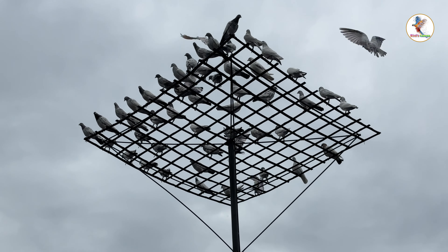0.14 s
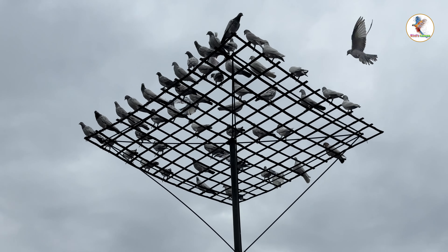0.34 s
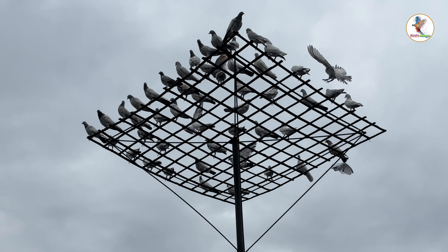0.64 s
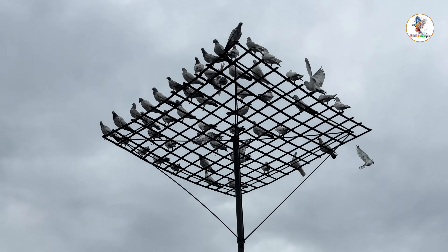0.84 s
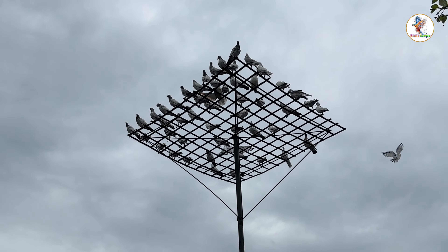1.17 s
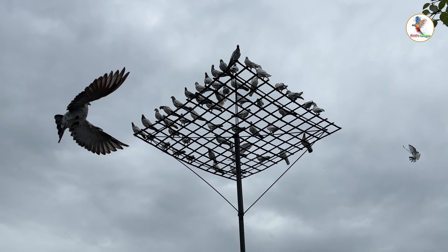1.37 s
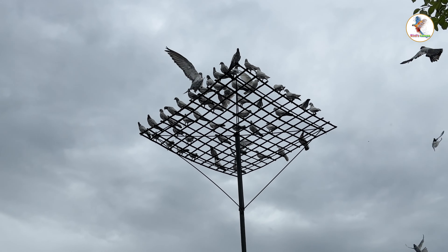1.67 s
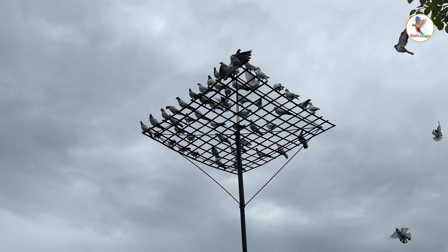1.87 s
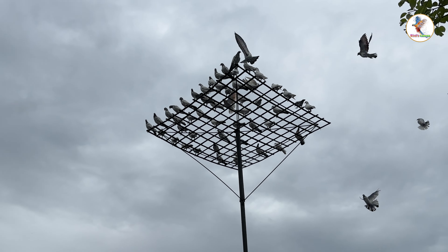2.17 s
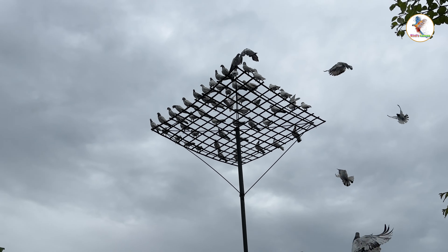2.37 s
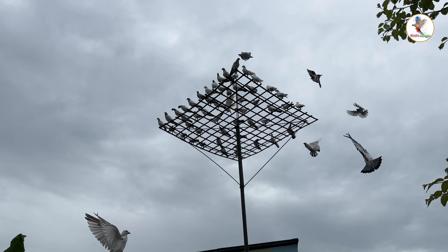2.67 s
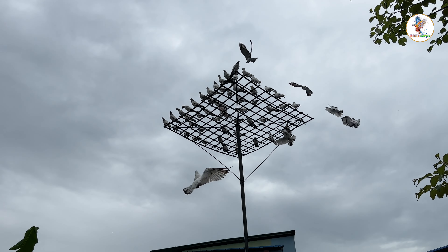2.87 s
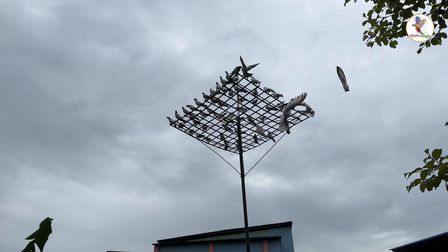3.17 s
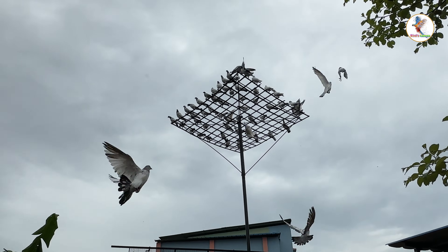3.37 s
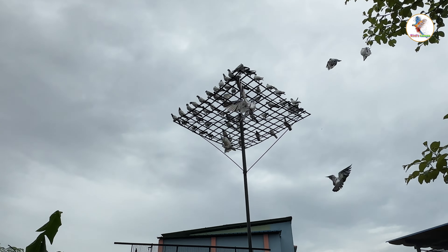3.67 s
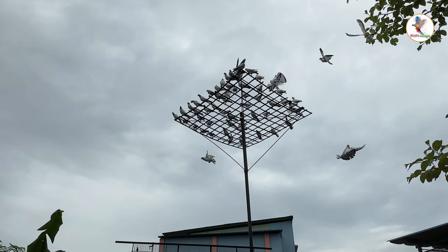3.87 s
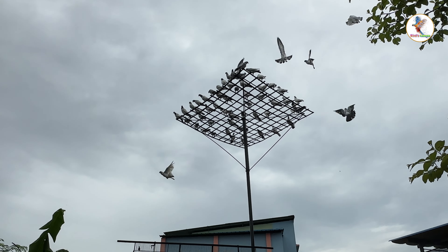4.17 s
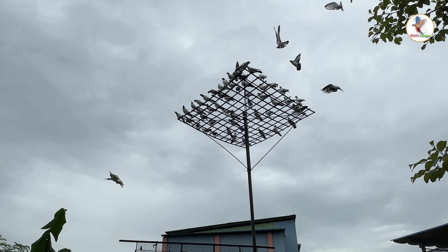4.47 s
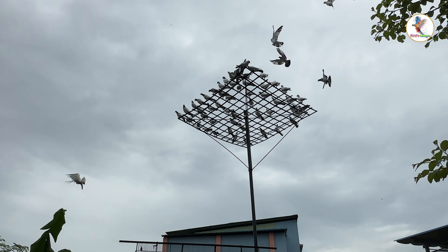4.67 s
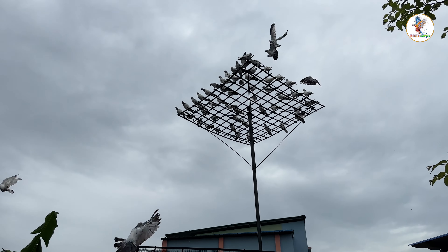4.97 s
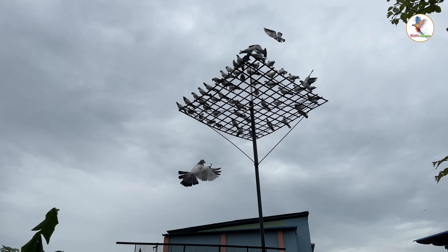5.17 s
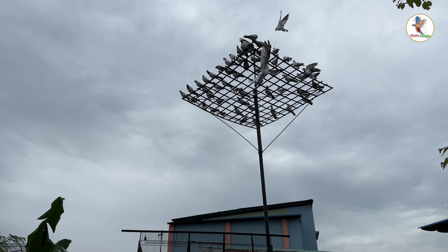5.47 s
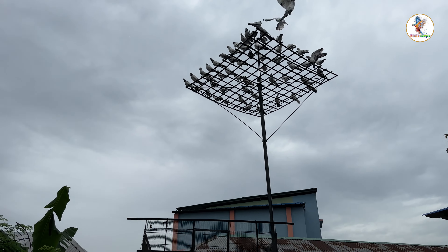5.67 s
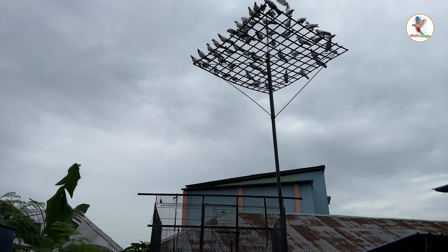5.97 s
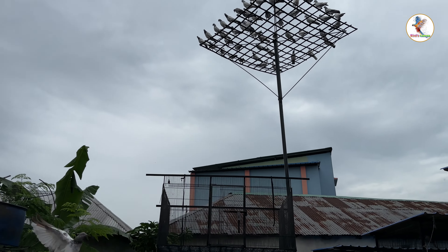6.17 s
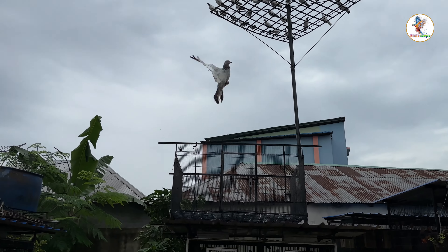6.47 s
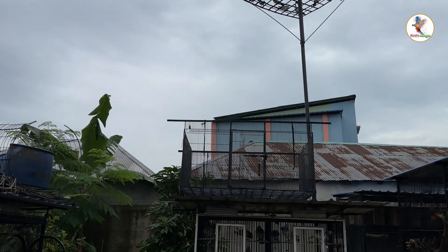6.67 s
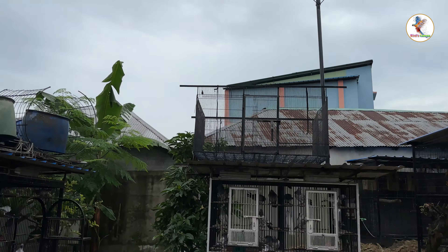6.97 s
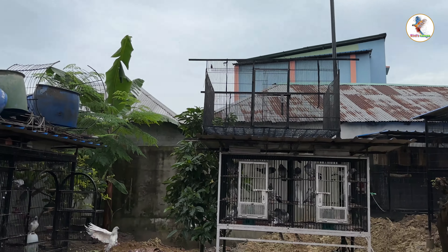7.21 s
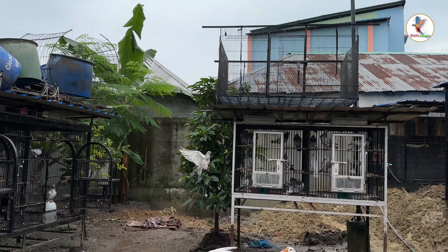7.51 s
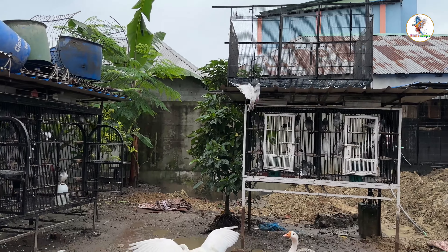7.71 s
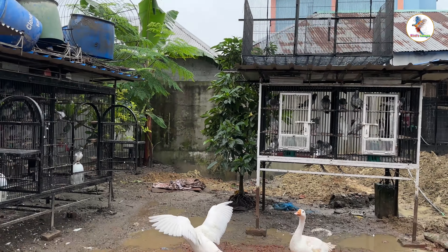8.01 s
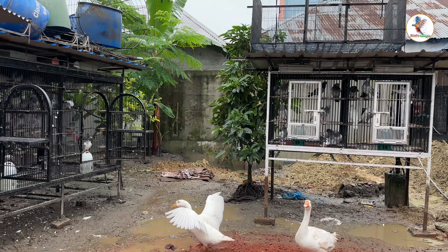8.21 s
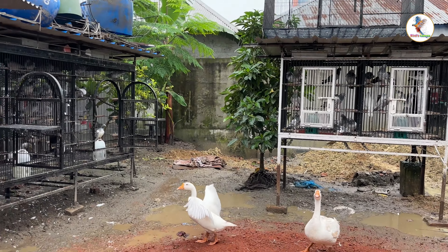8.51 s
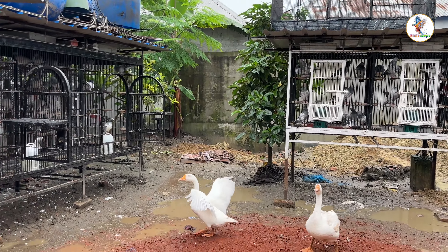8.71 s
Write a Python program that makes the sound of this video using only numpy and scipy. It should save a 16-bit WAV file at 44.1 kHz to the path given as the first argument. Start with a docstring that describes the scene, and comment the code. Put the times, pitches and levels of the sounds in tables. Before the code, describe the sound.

Outdoors, a flock rustles and flaps in bursts amid shrill trilled squeals, scattered peeps, two early quacks, breathy gabbling and late hoarse rasps.

```python
"""Wings rustle and swish over quiet outdoor noise all along; young pigeons soon beg with trilled squeals,
built from harmonics and hiss, and short sliding squeaks. Wing claps (bursts of noise) start early, and
a duck quacks twice (pulses through a throat filter). Then come dull wing thumps and soft low coos, next
the duck's breathy gabbles, and later hoarse rasps of noise. Fainter peeps are scattered throughout.
Walls and sheds answer the voices, claps and thumps with a brief tail of fading noise."""
import sys
import numpy as np
from scipy import signal
from scipy.fft import rfft, irfft, next_fast_len
from scipy.io import wavfile
from scipy.ndimage import uniform_filter1d, map_coordinates

SR = 44100
rng = np.random.default_rng(int(sys.argv[2]) if len(sys.argv) > 2 else 0)


def generate_wav(sig):
    """Save sig (samples, or channels by samples) to the path in sys.argv[1] as 16-bit PCM at SR."""
    pcm = np.round(np.clip(np.atleast_2d(sig).T, -1, 1) * 32767).astype(np.int16)
    wavfile.write(sys.argv[1], SR, pcm)


N = 390285

# Colour of the outdoor noise. Each row: frequency in Hz, relative strength in dB per Hz.
BACKGROUND_COLOUR = [(12, -36), (20, -20), (53, -17), (167, -3), (326, 6), (866, -9), (1740, -3.5),
                     (3600, -3.5), (4140, -5), (5030, -42), (9300, -9), (12600, -35), (15800, -32)]
# How long the yard's echo lasts. Each row: frequency in Hz, time to fall by 60 dB in seconds.
YARD_DECAY = [(200, 0.39), (1200, 0.12), (4500, 0.25), (12000, 0.061)]
# Rise and fall of the feather rustle. Each row: time in seconds, relative level in dB.
RUSTLE_LEVEL = [(0, -52), (.38, -35), (.7, -65.5), (1.03, -46), (1.3, -69), (1.66, -39.5), (2.1, -37.5),
                (2.38, -55), (3.03, -45.5), (3.25, -59), (3.65, -39.5), (4.5, -55.5), (4.7, -37),
                (5.08, -55), (5.45, -53.5), (6.18, -43), (6.5, -51), (8.85, -53)]
# Rise and fall of the air stirred by wings. Each row: time in seconds, relative level in dB.
SWISH_LEVEL = [(0, -49), (.84, -45.5), (1, -39), (1.2, -50.5), (1.7, -43), (3.1, -47.5), (3.6, -52.5),
               (4.7, -48.5), (5.38, -60), (5.68, -40.5), (6.2, -47.5), (6.66, -53), (6.85, -47.5),
               (7.5, -50), (8.12, -51.5), (8.6, -62)]
# Colour of feathers and of breath hiss. Each row: frequency in Hz, relative strength in dB per Hz.
FEATHER_COLOUR = [(1000, -66), (1900, -11.5), (3000, -1.5), (4300, 5.5), (5500, 0), (7500, -1), (9500, -10),
                  (11000, -10.5), (13000, -4.5), (15800, -16)]
# Colour of the stirred air. Each row: frequency in Hz, relative strength in dB per Hz.
SWISH_COLOUR = [(60, -8), (170, 1), (300, 10), (600, 6), (900, 0), (1400, 0.5), (2200, -20), (4000, -14)]
# Soft coos and low notes. Each row: start in seconds, length in seconds, pitch in Hz,
# level in dB, rasp from 0 to 1.
COOS = [(1.737, 0.057, 646, -36, 0.97), (1.791, 0.41, 584, -51.5, 0), (3.044, 0.27, 888, -50.5, .4),
        (4.095, .49, 591, -56, 0), (4.587, 0.087, 748, -36.5, 0.47), (5.424, 0.038, 400, -40, 0.2),
        (5.795, 0.1, 585, -39, .53), (6.238, 0.035, 718, -37.5, 1), (6.591, 0.058, 392, -33, 0.12),
        (6.651, .68, 589, -52.5, 0), (7.873, 0.1, 414.4, -43, 0.34)]
# Hoarse duck chatter. Each row: start in seconds, length in seconds, relative level in dB.
GABBLES = [(3.043, 0.085, -41), (3.366, 0.093, -48), (3.647, 0.13, -47.5), (3.785, 0.16, -50.5),
           (3.93, 0.1, -39.5), (4.207, 0.11, -45.5), (5.618, 0.055, -41), (6.78, 0.127, -41),
           (7.754, .048, -41), (7.962, .12, -47), (8.076, 0.054, -39)]
# Throat of the duck when it gabbles. Each row: frequency in Hz, relative strength in dB.
GABBLE_THROAT = [(300, -7), (600, -1), (780, 8), (880, -1), (1050, 6.5), (1230, -10), (1450, 15),
                 (1750, -5), (2400, -18)]
# Quacks. Each row: start in seconds, length in seconds, top pulse rate in Hz, level at the widest in dB.
QUACKS = [(.49, .26, 127.9, -29), (0.894, .215, 130.2, -27.5)]
# Throat of the duck with the bill open. Each row: frequency in Hz, relative strength in dB.
DUCK_THROAT = [(100, -30), (450, -43), (590, -27), (750, -15), (1000, -9.5), (1180, 12), (1310, 0.5),
               (1440, 8.5), (1620, -14), (2100, -24), (2600, -23), (5000, -47)]
# Harsh, almost toneless cries. Each row: start in seconds, length in seconds, level in dB.
RASPS = [(5.546, 0.15, -31.5), (6.799, 0.14, -35.5), (8.084, .15, -39)]
# Short squeaks. Each row: start in seconds, length in seconds, start pitch in Hz, end pitch in Hz,
# level in dB, rasp from 0 to 1.
SQUEAKS = [(0.106, 0.094, 4070, 2560, -46, 0.1), (0.183, 0.082, 2506, 2390, -34.5, 1),
           (.279, 0.12, 6170, 5710, -29.5, 0.6), (0.384, 0.089, 5160, 4480, -23, .45),
           (0.515, 0.099, 3900, 4226, -29.5, 0.83), (1.403, .15, 5880, 5150, -37, 0.8),
           (1.415, 0.11, 3260, 3100, -39.5, .6), (1.711, 0.049, 3600, 3000, -33, 0.73),
           (1.853, 0.065, 5660, 4860, -33, 0.1), (2.994, .2, 5480, 5180, -31.5, 0.88),
           (3.292, 0.11, 2558, 2720, -39, 0.5), (3.288, 0.14, 5580, 4960, -33, 0.6),
           (3.424, 0.13, 4110, 3330, -37, 0.45), (3.533, 0.066, 5230, 5530, -30, 0.26),
           (3.543, .31, 3245, 3430, -36, 0.94), (3.565, 0.17, 8480, 8120, -34, .9),
           (3.731, .15, 5050, 5210, -28, 0.98), (4.018, .11, 4980, 5530, -34.5, .6),
           (4.108, 0.039, 6430, 6420, -32, 0.28), (4.234, 0.069, 4014, 3936, -27, 0.4),
           (4.34, 0.056, 4880, 5100, -31, 0.87), (4.538, 0.089, 4170, 4180, -35.5, 0.93),
           (4.606, 0.014, 4680, 4530, -20, 0.06), (4.589, 0.06, 2746, 3160, -34, 0.83),
           (4.602, .11, 6760, 6180, -32.5, 0.53), (4.627, 0.092, 3560, 4380, -20.5, .65),
           (4.681, 0.101, 2790, 2980, -30.5, .6), (4.692, 0.111, 4275, 4170, -31.5, 0.8),
           (4.807, .12, 4320, 3750, -28.5, .95), (4.817, 0.16, 2320, 2620, -37, .9),
           (4.952, 0.097, 4524, 4450, -35.5, 0.83), (5.45, 0.04, 3350, 3250, -36, .22),
           (5.494, 0.029, 4027, 4024, -28, 0.36), (5.556, 0.076, 2453, 2480, -35.5, 0.42),
           (5.555, .16, 2997, 3200, -32.5, 0.99), (5.591, 0.073, 2000, 1565, -40.5, 0.89),
           (5.765, 0.17, 7830, 7950, -39, 0.94), (5.976, 0.035, 4470, 5420, -27, 0.45),
           (6.037, 0.082, 3830, 3460, -26, 0.52), (6.117, .17, 7470, 7440, -34, 0.81),
           (6.171, .29, 3210, 2823, -41.5, .6), (6.284, 0.053, 5000, 4980, -33, 0.4),
           (6.482, 0.062, 3080, 3110, -38.5, 0.99), (6.508, .11, 4044, 3773, -33, 0.04),
           (6.604, 0.082, 4030, 3690, -35.5, 1), (6.608, 0.063, 2796, 1983, -40.5, 0.67),
           (6.86, 0.076, 3650, 4290, -32, 0.79), (7.001, 0.038, 3750, 4250, -33.5, 0.35),
           (7.673, .14, 4574, 4416, -35.5, 0.73), (7.904, .13, 2100, 2205, -44.5, 0.43),
           (7.993, 0.12, 3910, 2600, -44.5, 0.2), (8.079, 0.14, 1310, 1713, -43, 0.93),
           (8.121, 0.093, 3106, 3280, -36.5, 0.85), (8.39, 0.085, 3920, 4090, -28, 0.61),
           (8.535, .1, 3760, 3860, -41.5, 0.5), (8.679, 0.095, 3446, 3660, -27, 0.49),
           (8.701, 0.037, 5040, 4070, -31.5, .75), (8.789, 0.068, 2730, 2144, -38.5, 0.75),
           (8.802, 0.044, 3670, 4310, -29.5, 0.76)]
# Begging squeals. Each row: start in seconds, length in seconds, pitch in Hz, fall of pitch in Hz,
# level of the second harmonic in dB, fundamental over it in dB, trill from 0 to 1, hiss setting in dB.
SQUEALS = [(-.01, 0.3, 2112, 79.5, -39, 2, 0.53, -26), (0.187, 0.24, 2063, 178.5, -34, -0.5, 0.68, -7),
           (0.789, .17, 2078, 198, -37.5, -16, 0.33, -25), (1.395, 0.3, 1997, 90.5, -39.5, -6, 0.59, 3.5),
           (1.667, 0.34, 2070, 187.5, -25, -16.5, 0.79, -17),
           (1.921, .31, 2241, 50.5, -24, -11, 0.42, -6.5), (2.44, .32, 2164, 138, -33, -16, 0.36, -22),
           (2.822, .31, 2072, 250, -26, -7.5, 0.76, -2.5), (3.439, 0.2, 2080, 27.5, -35, -28, 0.5, -12),
           (3.538, 0.23, 2130, -2.5, -27, -6.5, 0.82, -10), (3.726, 0.13, 2127, -110, -30, -9.5, 0.2, -13),
           (3.937, .18, 2118, 124, -33.5, -2.5, 0.48, -17), (4.183, .2, 2110, 238.5, -29.5, -11, 0.58, -8),
           (4.347, 0.1, 2190, 76, -31.5, -13, 0.6, -1.5), (5.766, 0.23, 2180, -72.5, -39, -12, 0, -23),
           (5.926, 0.29, 2240, 130, -34.5, 1.5, 0.3, -4), (6.096, .21, 1988, 322, -29.5, -5.5, 0.57, -4),
           (7.064, 0.23, 2033, 133, -53, -3, 0.7, -8), (7.441, 0.28, 2114, 41.5, -43.5, 3, 0.9, 0)]
# Strengths of the third to fifth harmonics of a squeal, one number each, in dB over the second.
OVERTONES_DB = [-6.5, -18.5, -31]
# Wing draughts that reach the microphone. Each row: start in seconds, level in dB.
DRAUGHTS = [(.975, -35), (1.067, -35), (1.638, -39), (2.4, -43), (6.054, -40), (4.66, -50), (7.874, -31)]
# Runs of close downstrokes. Each row: start in seconds, length in seconds, time between beats in seconds,
# relative level of the first beat in dB, loss per beat in dB, pitch of the thud in Hz.
STROKE_RUNS = [(1.006, .27, .106, -30.5, 2.5, 308), (1.655, .05, .1, -34, 0, 212),
               (2.116, .05, .1, -30, 0, 245), (2.254, .28, .11, -28, 2, 325),
               (4.636, .45, .099, -24.5, 3.5, 308), (5.698, .08, .05, -35, -5.5, 355),
               (6.061, .05, .1, -32, 0, 202), (7.071, .05, .1, -31.5, 0, 313),
               (8.119, .17, .111, -26, 7.5, 294)]
# Wing claps. Each row: start in seconds, relative level in dB, centre of the slap in Hz,
# relative level of the feather snap in dB.
CLAPS = [(.17, -31.5, 1450, -16), (.883, -29.5, 895, -7.5), (1.202, -40, 610, -20), (1.317, -36, 550, -9),
         (1.601, -27, 1300, 4), (1.662, -36.5, 1220, 4), (1.809, -36.5, 600, -8), (1.916, -36, 1320, 2),
         (2.024, -32.5, 1830, 12), (2.125, -36.5, 1310, 0), (2.342, -38, 980, 2), (2.488, -46, 1350, 18),
         (4.452, -38.5, 1110, 0), (5.862, -35.5, 600, -3), (5.911, -36, 1170, 6), (6.067, -35, 795, -8),
         (6.114, -36.5, 600, -4), (6.417, -35, 1180, 3), (6.792, -28, 775, -14), (6.806, -28.5, 1620, -29),
         (6.869, -41, 1370, -6), (6.957, -30, 1170, -1.5), (7.062, -30.5, 900, 3.5), (7.161, -32.5, 840, 4),
         (7.347, -34.5, 1100, 0), (7.89, -40, 1014, -9)]

TOP_HZ = 15850  # nothing is kept from here up
PEEP_DB, PEEP_SPREAD_DB = -3.5, 6  # level offset of the faintest peep, range up to the loudest
COO_DROOP_HZ = 6.6  # fall over one note, beneath a slight arch
QUACK_SAG, QUACK_SWELL_DB = 0.25, 21.5  # at both ends: share of pulse rate lost, level lost
SHUT_BILL = 0.882  # throat pitch with the bill shut, over its open value
SQUEAK_HISS_DB, SQUEAK_HISS_GROWS_DB = -29.5, 22  # hiss setting of a pure squeak, gain at full rasp
SQUEAL_ARCH = 0.0179  # hump in the middle of a call, as a share of the pitch
TRILL_HZ, TRILL_SLOWING_HZ = 72.43, 18.5  # rate at the start, loss by the end
TRILL_BEND, TRILL_DEPTH_DB = 0.063, 6.5  # swing of pitch (as a share) and of level at full trill
DRAUGHT_HZ = 22.4  # where a draught rumbles
BRUSH_DB = -10  # feathers brushing after the blow


def amp(db):
    """Turn decibels into a gain."""
    return 10 ** (np.asarray(db) / 20)


def unit(x):
    """Scale to an average (rms) strength of 1."""
    return x / np.sqrt(np.mean(np.abs(x) ** 2) + 1e-20)


def along(points, hz):
    """Read a table of (Hz, value) points, with straight lines on a log-frequency axis."""
    f, v = np.transpose(points)
    return np.interp(np.log(hz + 1), np.log(f + 1), v)


def level_at(points, t):
    """Read a table of (seconds, dB) points at the times t."""
    s, db = np.transpose(points)
    return np.interp(t, s, db)


def span(start, end):
    """Sample times from start to end, at least 64 of them."""
    return start + np.arange(max(int((end - start) * SR), 64)) / SR


def whole_scene():
    """Sample times of the whole scene."""
    return np.arange(N) / SR


def add(out, s, x):
    """Mix x into out from time s."""
    i = min(max(round(s * SR), 0), N)
    out[i:i + len(x)] += x[:N - i]


def wobble(t, rate):
    """A smooth random curve through `rate` random points a second."""
    u = (t - t[0]) * rate
    return map_coordinates(rng.standard_normal(int(u[-1]) + 4), [u + 1])


def filtered(x, response):
    """Make each frequency stronger or weaker by the given response."""
    m = next_fast_len(len(x) + 8192)
    hz = np.fft.rfftfreq(m, 1 / SR)
    return irfft(rfft(x, m) * response(hz), m)[:len(x)]


def noise(t, colour):
    """Noise of rms 1 with a colour given as (Hz, dB) points."""
    white = rng.standard_normal(len(t))
    return unit(filtered(white, lambda hz: amp(along(colour, hz))))


def band(t, centre_hz, octaves):
    """Noise of rms 1 in a bell-shaped band around a centre."""
    def bell(hz):
        return np.exp(-.5 * (np.log2((hz + 1) / centre_hz) / octaves) ** 2)
    return unit(filtered(rng.standard_normal(len(t)), bell))


def patchy(x, depth_db):
    """Shift the colour of a sound in small patches, a few hundred Hz by a few tens of ms."""
    z = signal.stft(x, nperseg=512)[2]
    field = rng.standard_normal(z.shape)
    for _ in range(2):
        field = uniform_filter1d(field, size=3, axis=0)  # blur over frequency
        field = uniform_filter1d(field, size=8, axis=1)  # blur over time
    return unit(signal.istft(z * amp(depth_db * unit(field)), nperseg=512)[1][:len(x)])


def breathy(t):
    """Patchy hiss of air through an open beak, strongest in the middle of a call."""
    longer = span(0, len(t) / SR + .1)
    return patchy(noise(longer, FEATHER_COLOUR), depth_db=4.5)[:len(t)] * np.hanning(len(t))


def fade(t, rise, fall):
    """Soft ends for a note, rise and fall in seconds."""
    ramps = np.minimum((t - t[0]) / rise, (t[-1] - t) / fall)
    return np.sin(np.pi / 2 * np.clip(ramps, 0, 1))


def swell(t, rise):
    """A push that peaks at 1 after `rise` seconds and then dies away."""
    return t / rise * np.exp(1 - t / rise)


def partial(t, phase, rasp, width_hz):
    """A whistle of rms 1; rasp is the share that turbulence smears into a narrow band."""
    def churn(rate):
        return unit(wobble(t, rate) + 1j * wobble(t, rate))
    rasp = np.clip(rasp, 0, 1)
    smear = unit(churn(width_hz) + 0.78 * churn(2.5 * width_hz))
    steady_and_smeared = np.sqrt(1 - rasp) + np.sqrt(rasp) * smear
    return unit(np.real(steady_and_smeared * np.exp(1j * phase)))


def glide(t, start_hz, end_hz, arch, waver):
    """Phase of a note that slides along a slight arch and wavers."""
    u = np.linspace(0, 1, len(t))
    line = start_hz + (end_hz - start_hz) * u
    pitch = line * (1 + arch * np.sin(np.pi * u) + waver * wobble(t, 164.0))
    return 2 * np.pi * np.cumsum(pitch) / SR


def background():
    """Quiet outdoor air: coloured noise over a deep rumble, both wavering in level."""
    t = whole_scene()
    air = amp(-55.5 + 0.67 * wobble(t, 2.94)) * noise(t, BACKGROUND_COLOUR)
    rumble = amp(-62 + 4 * wobble(t, 6.3)) * band(t, 39, octaves=1.0)
    return air + rumble


def yard(x):
    """Walls and sheds answer with a tail of noise; each frequency dies at its own speed."""
    hz, t, z = signal.stft(rng.standard_normal(SR // 2), SR, nperseg=256)
    decay = amp(-60 * t / along(YARD_DECAY, hz)[:, None])
    tail = signal.istft(z * decay, SR, nperseg=256)[1]
    late = np.pad(x, (200, 0))  # the answer starts 200 samples late
    return signal.fftconvolve(late, tail / np.linalg.norm(tail))[:N]


def flock():
    """Many wings at once: scratchy feather rustle above a soft, beating swish, both of noise."""
    t = whole_scene()
    scratch = unit(amp(2.2 * wobble(t, 60) + 0.82 * wobble(t, 500)))
    feathers = patchy(noise(t, FEATHER_COLOUR), depth_db=3.8)
    rustle = amp(level_at(RUSTLE_LEVEL, t) + 5.5) * scratch * feathers
    beating = amp(2 * wobble(t, 22))
    stirred_air = patchy(noise(t, SWISH_COLOUR), depth_db=2.5)
    swish = amp(level_at(SWISH_LEVEL, t) - 2.5) * beating * stirred_air
    return rustle + swish


def chorus(count=260):
    """Fainter peeps from the rest of the flock: sliding whistles, louder when the rustle is loud."""
    out = np.zeros(N)
    for when, height, long, slide, loud in rng.random((count, 5)):
        s = when * N / SR
        t = span(s, s + 0.0213 + 0.0735 * long)
        hz = 2300 * 3.2 ** height
        phase = glide(t, hz, hz * (.91 + .16 * slide), arch=.01, waver=.008)
        whistle = partial(t, phase, rasp=0.27, width_hz=234) * fade(t, rise=0.0043, fall=0.016)
        db = level_at(RUSTLE_LEVEL, t) + along(FEATHER_COLOUR, hz) + PEEP_DB + PEEP_SPREAD_DB * loud
        add(out, s, amp(db) * whistle)
    return out


def coos():
    """Low notes, from pure to hoarse, that swell, sag in pitch and fade."""
    out = np.zeros(N)
    for s, length, hz, db, rasp in COOS:
        t = span(s, s + length)
        phase = glide(t, hz + COO_DROOP_HZ / 2, hz - COO_DROOP_HZ / 2, arch=0.0044, waver=0.0091)
        note = partial(t, phase, rasp, width_hz=120)
        add(out, s, amp(db) * note * fade(t, rise=0.21 * length, fall=.5 * length))
    return out


def gabbles():
    """A low, breathy chatter through the duck's half-closed bill: throat-coloured noise that flutters."""
    out = np.zeros(N)
    for s, length, db in GABBLES:
        t = span(s, s + length)
        flutter = unit(amp(np.sin(glide(t, 106.0, 122.5, arch=0.059, waver=0.029))))
        breath = noise(t, GABBLE_THROAT) * fade(t, rise=0.021, fall=0.054)
        add(out, s, amp(db - 1.5) * flutter * breath)
    return out


def duck():
    """Uneven pulses ring the throat; rate, level and throat pitch arch as the bill opens and shuts."""
    def throat(source, scale):
        return unit(filtered(source, lambda hz: amp(along(DUCK_THROAT, hz / scale))))
    out = np.zeros(N)
    for s, length, top_hz, db in QUACKS:
        t = span(s, s + length)
        opening = np.sin(np.pi * np.linspace(0, 1, len(t)) ** .9)
        rate = top_hz * (1 - QUACK_SAG * (1 - opening)) * (1 + 0.009 * wobble(t, 96))
        cycle = np.cumsum(rate) / SR
        clicks = np.diff(np.floor(cycle), prepend=0)  # one at each whole cycle
        pulses = unit(clicks * amp(1.9 * wobble(t, 122)))
        source = pulses + .4 * rng.standard_normal(len(t))
        wide, shut = throat(source, 1), throat(source, SHUT_BILL)
        voice = opening ** 2 * wide + (1 - opening ** 2) * shut
        level = amp(db - QUACK_SWELL_DB * (1 - opening) ** 1.6)
        add(out, s, level * voice * fade(t, rise=.01, fall=0.011))
    return out


def rasps():
    """Hoarse cries that are all rattling hiss: breath noise with a quickly shaking level."""
    out = np.zeros(N)
    for s, length, db in RASPS:
        t = span(s, s + length)
        rattle = unit(amp(1.9 * wobble(t, 203)))
        add(out, s, amp(db) * breathy(t) * rattle)
    return out


def squeaks():
    """Short sliding whistles; the hoarser, the wider, the more broken and the more hissy."""
    out = np.zeros(N)
    for s, length, start_hz, end_hz, db, rasp in SQUEAKS:
        t = span(s, s + length)
        phase = glide(t, start_hz, end_hz, arch=0.00944, waver=0.0094)
        width_hz = 80 + 480 * rasp
        octave = amp(-29) * partial(t, 2 * phase, rasp, width_hz)
        voice = partial(t, phase, rasp, width_hz) + octave
        voice = voice * fade(t, rise=0.18 * length, fall=0.26 * length)
        hiss_gain = amp(SQUEAK_HISS_DB + SQUEAK_HISS_GROWS_DB * rasp)
        hiss = hiss_gain * band(t, start_hz, octaves=0.6) * np.hanning(len(t))
        rattle = unit(amp(3.8 * rasp * wobble(t, 220)))
        add(out, s, amp(db) * rattle * (voice + hiss))
    return out


def squeals():
    """Begging young: an arching, drooping voice, chopped and bent by a slowing trill, over a hiss."""
    out = np.zeros(N)
    for s, length, hz, fall_hz, db, fundamental_db, depth, hiss_db in SQUEALS:
        t = span(s, s + length)
        u = np.linspace(0, 1, len(t))
        pitch = hz * (1 - SQUEAL_ARCH * (2 * u - 1) ** 2) - fall_hz * (u - .5)
        trill_rate = (TRILL_HZ - TRILL_SLOWING_HZ * u) * (1 + 0.061 * wobble(t, 33.6))
        trill = 2 * np.pi * np.cumsum(trill_rate) / SR
        bend = 1 + TRILL_BEND * depth ** 2 * np.sin(trill) + .009 * wobble(t, 45)
        pulsing = unit(amp(TRILL_DEPTH_DB * depth * np.cos(trill)))
        phase = 2 * np.pi * np.cumsum(pitch * bend) / SR  # each pulse sweeps upward
        voice = np.zeros(len(t))
        for k, level in enumerate([fundamental_db, 0, *OVERTONES_DB], 1):
            voice += amp(level) * partial(t, k * phase, rasp=.28, width_hz=300)
        voice = voice * pulsing * fade(t, rise=0.035, fall=0.48 * length)
        hiss = amp(hiss_db) * breathy(t) * pulsing ** .7  # the hiss pulses less
        add(out, s, amp(db) * (voice + hiss))
    return out


def draughts():
    """Slow puffs of wing-driven air on the microphone: very low noise that swells and dies."""
    out, t = np.zeros(N), span(0, 0.15)
    for s, db in DRAUGHTS:
        add(out, s, amp(db) * band(t, DRAUGHT_HZ, octaves=0.52) * swell(t, 0.01))
    return out


def downstrokes():
    """Close strokes shove the air in even runs: a few dull cycles over a deep push."""
    out, t = np.zeros(N), span(0, 0.15)
    for s, length, period, db, loss_db, thud_hz in STROKE_RUNS:
        for beat, delay in enumerate(np.arange(0, length, period)):
            hz = thud_hz * (1 + 0.013 * rng.standard_normal())
            tone = np.sin(2 * np.pi * hz * t * (1 - t))  # pitch falls as it dies
            thud = (tone + .5 * band(t, hz, octaves=0.49)) * swell(t, 0.0051)
            push = amp(-23.5) * band(t, 76.4, octaves=0.19) * swell(t, 0.036)
            add(out, s + delay, amp(db - 4 - loss_db * beat) * (thud + push))
    return out


def claps():
    """Wing tips meet: a hollow slap, a snap of quills and a fluttering brush of feathers."""
    out, t = np.zeros(N), span(0, 0.53)
    for s, db, centre_hz, snap_db in CLAPS:
        # -60 * t / d falls by 60 dB in d seconds
        brush = amp(BRUSH_DB - 60 * t / 0.12 + 2.1 * wobble(t, 180))
        onset = 1 - np.exp(-t / 0.0005)
        blow = (amp(-60 * t / 0.041) + brush) * onset
        slap = band(t, centre_hz, octaves=0.5) * blow
        snap = band(t, 8000, octaves=1.0) * amp(-60 * t / 0.042)
        add(out, s, amp(db + 0.5) * (slap + amp(snap_db - 5.0) * snap))
    return out


def scene():
    """Voices and wings in the yard, with its answer, over the flock and the background."""
    voices = squeals() + squeaks() + rasps() + chorus() + coos() + duck() + gabbles()
    wings = claps() + downstrokes() + draughts()
    answer = yard(amp(-5.0) * voices + amp(-11.5) * wings)
    return (voices + wings + answer + flock() + background())[None]


def record(dry):
    """Keep only what lies below the band limit."""
    return np.array([filtered(x, lambda hz: hz < TOP_HZ) for x in dry])


dry = scene()
out = record(dry)
generate_wav(out)
```